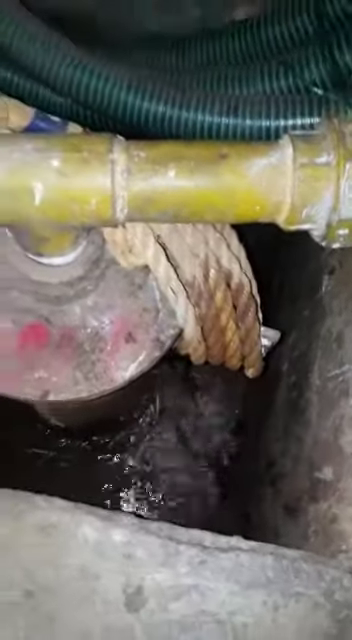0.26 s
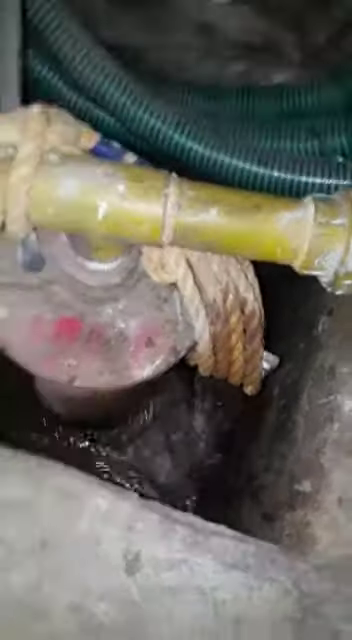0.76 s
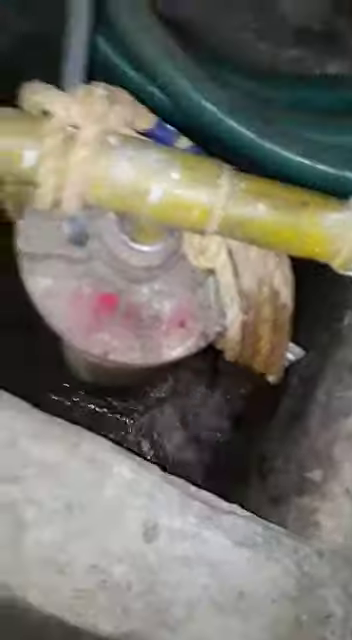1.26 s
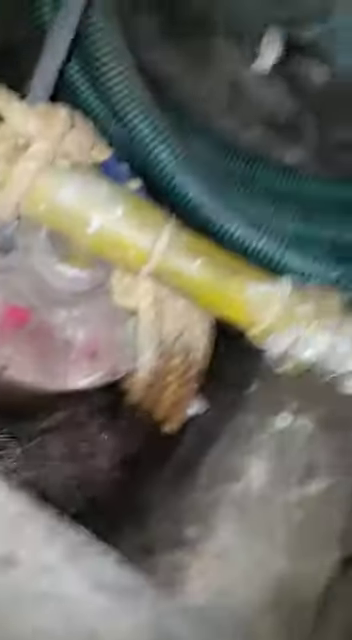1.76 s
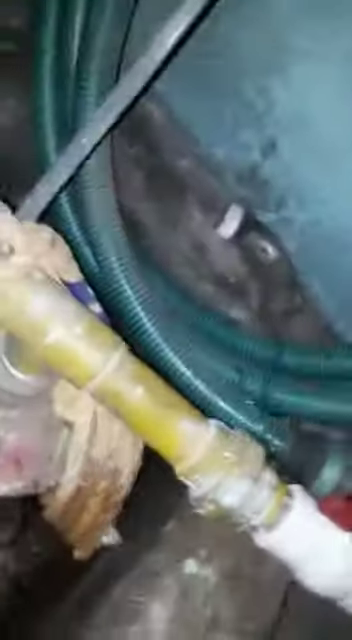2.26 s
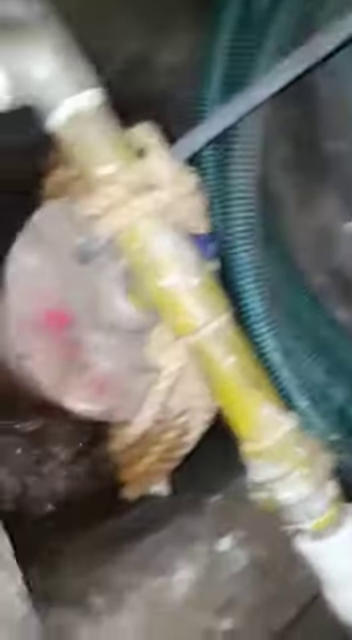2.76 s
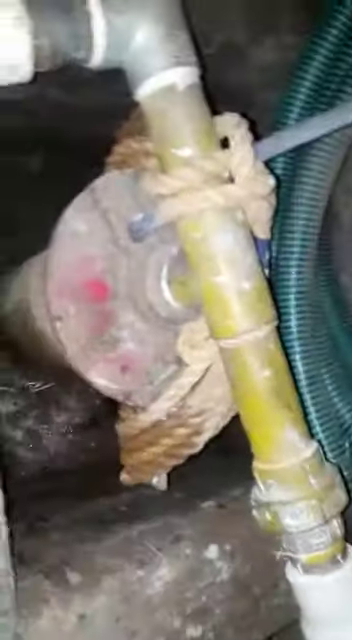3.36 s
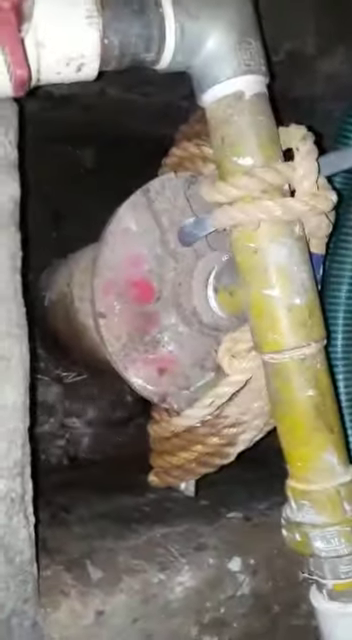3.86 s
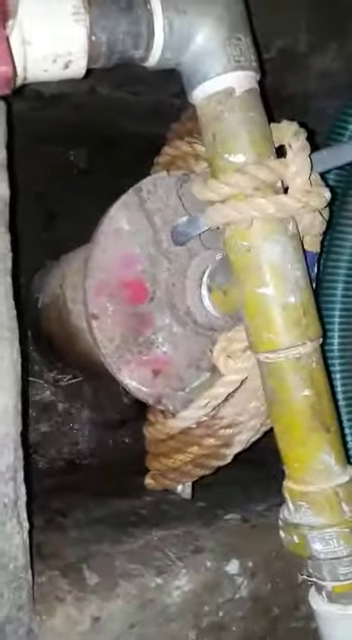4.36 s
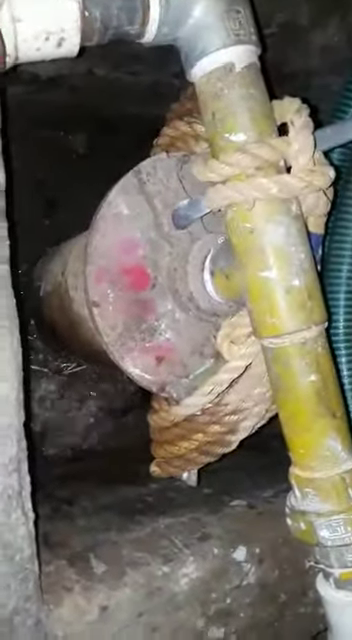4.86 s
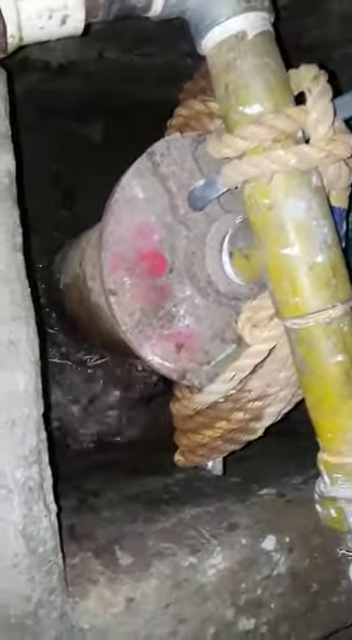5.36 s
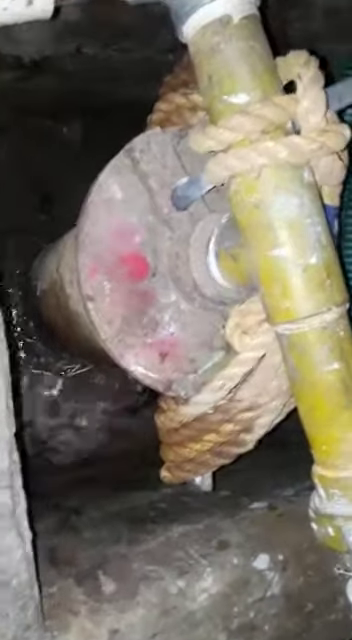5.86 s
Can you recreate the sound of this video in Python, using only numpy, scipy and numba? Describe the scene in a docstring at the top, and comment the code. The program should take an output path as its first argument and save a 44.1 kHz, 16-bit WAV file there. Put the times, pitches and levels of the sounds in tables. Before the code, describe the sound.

A leaking pipe spatters onto wet stone, crisp irregular plinks echoing closely, spray strongest at first, over a very quiet background hush.

```python
"""A narrow concrete pit: water leaks from a pipe joint, heard from a phone held above it.
Behind it lie far flow, room noise and a faint hollow drone, all bands of filtered noise.
A hand shifting on the phone rumbles, rubs once and taps. Fine spray ticks on wet stone,
and drops trap bubbles that ring a few cycles as damped sines; the hard walls echo and ring."""
import sys
import numpy as np
from scipy import signal
from scipy.io import wavfile
from scipy.ndimage import uniform_filter1d
from numba import njit

SR = 44100
rng = np.random.default_rng(int(sys.argv[2]) if len(sys.argv) > 2 else 0)


def to_wav(s):
    """Save 16-bit WAV."""
    ch = np.atleast_2d(s).T  # columns
    pcm = np.round(np.clip(ch, -1, 1) * 32767)  # PCM
    wavfile.write(sys.argv[1], SR, pcm.astype(np.int16))


N = 269451  # length in samples


def undb(db):
    """Amplitude gain from decibels."""
    return 10 ** (np.asarray(db) / 20)


def level(x, db):
    """Scale a sound to an RMS level in dB."""
    return x * undb(db) / np.sqrt(np.mean(x ** 2))


def curve(table, column=1):
    """One column of a table at every sample, in straight lines between its times."""
    rows = np.array(table)
    return np.interp(np.arange(N) / SR, rows[:, 0], rows[:, column])


def balance(table, hz):
    """Level in dB at a pitch, read from a table of pitches and levels along log frequency."""
    rows = np.array(table)
    return np.interp(np.log(hz), np.log(rows[:, 0]), rows[:, 1])


def band(x, hz, width):
    """Two-pole resonance, gain 1 at the centre."""
    b, a = signal.iirpeak(min(hz, .45 * SR), hz / width, fs=SR)
    return signal.lfilter(b, a, x)


def walk(rate):
    """Random levels held 1 / rate s and slewed twice; spread near 1."""
    hold = int(SR / rate)
    steps = np.repeat(rng.standard_normal(N // hold + 1), hold)
    smooth = uniform_filter1d(uniform_filter1d(steps, hold), hold)
    return 1.2 * smooth[:N]


def swell(start, attack, hold, release):
    """Gain that grows exponentially up to start, holds at 1, then dies away; all in seconds."""
    t = np.arange(N) / SR - start
    return np.exp(np.minimum(t / attack, 0) - np.maximum(t - hold, 0) / release)


@njit
def grains(n, start, turn, cycles, size, glide):
    """Damped sines with a soft first cycle; pitch rises by the fraction glide per 20 dB of decay."""
    out = np.zeros(n)
    for g in range(len(start)):
        samples = cycles[g] * 2 * np.pi / turn[g]  # time to fall 20 dB
        phase = 0.
        for i in range(min(int(2.5 * samples), n - start[g])):
            phase += min(turn[g] * (1 + glide[g] * i / samples), 2.8)  # stay below half the sample rate
            fade = np.exp(-2.3 * i / samples)
            onset = min(phase / 6.28, 1.)
            out[start[g] + i] += size[g] * fade * onset * np.sin(phase)
    return out


def ring(s, db, hz, cycles, glide):
    """Grains from times, levels, starting pitches, cycles to fall 20 dB and fractional glide."""
    start = (s * SR).astype(np.int64)
    cycles = np.clip(cycles, .5, 60) + 0 * hz  # adding 0 * hz gives every grain its own value
    return grains(N, start, 2 * np.pi * hz / SR, cycles, undb(db), glide + 0 * hz)


# Colour of the far flow and room noise. Each row: frequency in Hz, relative density in dB per Hz.
HUSH_COLOUR = [(18, -32), (53, -25), (121, -16), (355, -10), (937, -13), (1720, -14), (4000, -15),
               (16000, -15)]
HUSH_DB, HUSH_WAVER_DB = -59.5, 1.5  # overall RMS, and the wander of each band


def hush():
    """Far flow and room noise: half-octave noise bands waver alone and flicker together."""
    out = 0
    flurry = 2.1 * walk(25.17)  # dB, shared by all bands
    for hz in 40 * 2 ** np.arange(0, 8.7, .5):
        db = balance(HUSH_COLOUR, hz) + HUSH_WAVER_DB * walk(4.97) + flurry
        noise = band(band(rng.standard_normal(N), hz, hz / 2), hz, hz / 2)
        out = out + undb(db) * noise
    return level(out, HUSH_DB)


# The faint hollow drone coming and going. Each row: time in seconds, gain in dB.
DRONE_GAIN = [(0, -66), (1.1, -72), (2.5, -61.5), (3.05, -64.5), (3.3, -74.5), (6.11, -72.5)]


def drone():
    """A narrow wavering band of noise, hollow because two resonances near 360 Hz shape it."""
    noise = band(band(rng.standard_normal(N), 365, 97), 351, 160)
    waver = 2.0 * walk(6.73)  # dB
    return level(noise, -1.9) * undb(curve(DRONE_GAIN) + waver)


# The grip shifts and the case rumbles. Each row: start in seconds, hold in seconds, gain in dB.
GRIP_SHIFTS = [(.42, .42, -68.5), (1.75, 0.15, -70), (2.437, .2, -67.5), (3.306, 0.25, -80),
               (3.874, .09, -61), (4.03, 0.1, -68.5), (5.1, 0.3, -65)]
SHIFT_ATTACK_S, SHIFT_RELEASE_S = 0.019, .02
REST_DB = -73.5  # rumble gain between shifts


def grip_rumble():
    """Low lumpy rumble: three broad low resonances of noise, swelling at each shift of the grip."""
    grip = undb(REST_DB)
    for s, hold, db in GRIP_SHIFTS:
        grip = grip + undb(db) * swell(s, SHIFT_ATTACK_S, hold, SHIFT_RELEASE_S)
    lumps = undb(4 * walk(50))
    noise = band(band(band(rng.standard_normal(N), 78, 150), 168, 186), 96, 370)
    return level(noise, 0) * grip * lumps


RUB_S, RUB_ATTACK_S, RUB_HOLD_S, RUB_RELEASE_S = 1.23, .007, .056, 0.014
RUB_DB = -39.5  # RMS before the swell shapes it


def skin_rub():
    """One scrape of skin on the case: uneven noise through body resonances, briefly let through."""
    slips = rng.standard_normal(N) * undb(1.9 * walk(300))
    low = band(band(slips, 250, 220), 260, 220)
    skin = band(slips, 455, 330) + 0.084 * band(slips, 860, 1200) + 0.34 * low
    return level(skin, RUB_DB) * swell(RUB_S, RUB_ATTACK_S, RUB_HOLD_S, RUB_RELEASE_S)


# Soft finger taps on the phone. Each row: start in seconds, level in dB before the bass cut, pitch in Hz.
FINGER_TAPS = [(0.417, -24, 890), (0.658, -32, 450), (1.284, -26, 520), (2.225, -26, 595),
               (2.746, -35.5, 210), (3.231, -36, 372), (3.507, -36.5, 101), (4.991, -39.5, 110),
               (5.41, -36.5, 110)]
BASS_CUT_HZ = 60


def hand():
    """Handling noise at the microphone: rumble, rub and heavily damped taps, with the deep bass cut."""
    s, db, hz = np.transpose(FINGER_TAPS)
    handling = grip_rumble() + skin_rub() + ring(s, db, hz, 1.37, 0.)
    b, a = signal.butter(2, BASS_CUT_HZ, "high", fs=SR)
    return signal.lfilter(b, a, handling)


# The leak as heard from the moving phone.
# Each row: time in seconds, small bubbles in dB, fine spray in dB, sound sent to the walls in dB.
FLOW_LEVELS = [(0, -49, -41.5, -8.5), (1, -59.5, -49, -2.5), (1.6, -63, -44.5, -2.5), (2, -52.5, -59, -1.5),
               (2.5, -56.5, -58, 0.5), (3, -56, -57.5, 0.5), (4, -55.5, -61.5, -0.5), (5, -55, -59, -1.5),
               (6.11, -52.5, -54, 2)]
# The loudest spray striking wet stone. Each row: start in seconds, level in dB, centre pitch in Hz.
LOUD_SPLATS = [(0.086, -16, 11500), (0.1047, -16, 14100), (0.1796, -5.5, 11900), (0.3519, -9.5, 10900),
               (0.402, -8, 10600), (0.4985, -0.5, 15200), (0.552, -10, 15200), (0.6055, -17, 14700),
               (0.662, -16, 12900), (0.7433, -11, 14100), (0.825, -24, 13200), (0.8863, -7.5, 13800),
               (1.1093, -12, 14700), (1.1963, -11, 15500), (1.244, -7.5, 15600), (1.5294, -9.5, 15100),
               (1.5798, -3, 14000), (2.137, -17, 10500), (2.166, -17, 14100), (2.2672, -21.5, 13700),
               (2.3267, -20, 12700), (2.6633, -18, 13400), (3.3885, -14.5, 12500), (4.914, -33, 13400)]
MIST_FLURRY_DB = 3.5


def spray(count=9000):
    """Droplets too small to trap air tick on the stone as very short high rings, in flurries."""
    s, db, hz = np.transpose(LOUD_SPLATS)
    when, pitch, big = rng.random((count, 3)).T
    ticks = ring(when * N / SR, 16 * big ** 4, 5000 + 11000 * pitch, 1.2 + 3 * pitch, 0.)
    mist = ticks * undb(MIST_FLURRY_DB * walk(40))
    return ring(s, db, hz, 3.2, 0.) + level(mist, 0) * undb(curve(FLOW_LEVELS, column=2))


# Loudness of the small bubbles by pitch. Each row: pitch in Hz, relative level in dB.
BUBBLE_BALANCE = [(900, -24.5), (1500, -24.5), (2700, 2.5), (4000, 0.5), (6000, 6), (8500, 11), (11000, -3)]


def small_bubbles(count=2000):
    """Many tiny drops at chance moments, each ringing a bubble whose pitch rises."""
    when, pitch, big, long = rng.random((count, 4)).T
    hz = 900 * 12 ** pitch
    db = balance(BUBBLE_BALANCE, hz) + 13 * big ** 3  # a few stand out
    bubbles = ring(when * N / SR, db, hz, 2.1 + 5.3 * long, 0.11)
    return level(bubbles, 0) * undb(curve(FLOW_LEVELS))


LESSER_LOW_HZ, LESSER_HIGH_HZ = 1358, 8580
LESSER_CYCLES = 5.2  # mean cycles to fall 20 dB
LESSER_DB, LESSER_DB_PER_OCTAVE = -42, 7  # mean level at 2.5 kHz, and its rise with pitch
LESSER_SPREAD_DB = 10  # full range around the mean


def lesser_drips(count=130):
    """Weaker drops drawn by chance, as rows of start, level, bubble pitch and cycles."""
    when, pitch, big, long = rng.random((count, 4)).T
    hz = LESSER_LOW_HZ * (LESSER_HIGH_HZ / LESSER_LOW_HZ) ** pitch
    db = LESSER_DB + LESSER_DB_PER_OCTAVE * np.log2(hz / 2500) + LESSER_SPREAD_DB * (big - .5)
    return np.transpose([when * N / SR, db, hz, LESSER_CYCLES * (.5 + long)])


# The drops that stand out.
# Each row: start in seconds, level in dB before the walls, bubble pitch in Hz, cycles to fall 20 dB.
CLEAR_DRIPS = [(0.0398, -26, 3000, 3.9), (0.0853, -35.5, 1830, 7.9), (0.219, -22.5, 2210, 4.3),
               (0.3592, -25, 3720, 8.7), (0.5323, -25.5, 2950, 4.9), (0.5592, -24, 5950, 7.8),
               (0.568, -34, 1116, 8.6), (0.6395, -18, 3260, 5), (0.692, -37.5, 1166, 10.7),
               (0.7167, -27.5, 5400, 7.6), (0.745, -27, 2900, 5.9), (0.7532, -30, 1970, 3),
               (0.8062, -21.5, 7750, 14), (0.8602, -27.5, 4360, 5.5), (0.8741, -45, 1400, 6.6),
               (0.977, -33.5, 2120, 3.7), (1.084, -41.5, 1340, 10), (1.1176, -25, 3870, 3.7),
               (1.1527, -30, 3460, 6.3), (1.2342, -20.5, 2870, 5.4), (1.3574, -43, 2700, 16),
               (1.4467, -20, 8240, 14.6), (1.4664, -39.5, 2550, 9.8), (1.4918, -39, 2580, 9.7),
               (1.5206, -24.5, 1790, 2.2), (1.5296, -22.5, 3560, 5.5), (1.7085, -27.5, 1950, 1.8),
               (1.7283, -33, 3430, 15), (1.754, -21, 6200, 3.5), (1.775, -30.5, 2600, 8.4),
               (1.845, -33.5, 1650, 4), (1.906, -34.5, 2490, 12), (1.9455, -25.5, 3270, 5.9),
               (1.98, -30, 5480, 13), (2.0553, -30, 2240, 8.4), (2.0862, -25.5, 2540, 8.6),
               (2.087, -30, 1240, 4.5), (2.1377, -38.5, 1400, 14), (2.1587, -26.5, 3850, 2.3),
               (2.212, -35, 2950, 9.9), (2.2236, -25, 5900, 5.2), (2.3498, -33, 2980, 5.9),
               (2.423, -38, 2470, 6.3), (2.4533, -41.5, 1490, 7.4), (2.5283, -28, 8600, 13),
               (2.5547, -25.5, 4250, 2.7), (2.6655, -20, 4560, 4), (2.717, -36, 2170, 11),
               (2.768, -33, 1400, 2.9), (2.839, -23, 2870, 5.5), (2.8937, -24.5, 2830, 2.3),
               (3.1008, -47.5, 1750, 18), (3.1639, -17.5, 2836, 15.4), (3.252, -31.5, 2830, 8.4),
               (3.375, -20.5, 2950, 4.9), (3.4618, -28, 3360, 13), (3.6, -34.5, 2730, 13),
               (3.6215, -25.5, 7470, 10), (3.6911, -26, 5900, 7.5), (3.7844, -28, 3280, 4.9),
               (3.9018, -32.5, 2570, 10), (3.9323, -28.5, 2760, 7.7), (4.033, -24, 5830, 7.2),
               (4.0532, -36.5, 1520, 5.2), (4.1099, -26.5, 2600, 2.9), (4.1301, -47, 1020, 6.5),
               (4.2217, -29, 2200, 2.5), (4.2588, -27, 2210, 2), (4.3164, -33, 3280, 5.1),
               (4.3643, -12.5, 3100, 6.9), (4.4539, -29.5, 2380, 3.5), (4.4922, -25.5, 5640, 8.1),
               (4.5044, -26.5, 2570, 3.6), (4.5262, -24.5, 2780, 5.3), (4.5272, -17.5, 6250, 4.3),
               (4.5608, -30.5, 1790, 7.8), (4.5844, -30.5, 2560, 19), (4.67, -22.5, 4650, 6.4),
               (4.6824, -15.5, 3190, 7.4), (4.7542, -46, 1500, 9.9), (4.798, -31.5, 5650, 8.8),
               (4.9166, -19.5, 2920, 4.9), (5.0096, -34, 2960, 10), (5.026, -31.5, 5440, 24),
               (5.1213, -31.5, 1630, 4.5), (5.1702, -30, 2870, 6.7), (5.2547, -34.5, 2520, 7.5),
               (5.2743, -26, 7050, 6.2), (5.4216, -46, 1740, 16), (5.4766, -39.5, 1340, 7.5),
               (5.5344, -28, 6050, 11), (5.5535, -26.5, 4600, 6.4), (5.598, -20.5, 5200, 3.5),
               (5.6477, -29, 4100, 6.1), (5.6977, -46, 1530, 16), (5.7549, -21, 4160, 5.6),
               (5.7634, -37, 1600, 6.9), (5.7846, -24, 2670, 3.7), (5.8371, -43.5, 1750, 17),
               (5.9402, -39, 1510, 4.7), (6.083, -23, 2800, 1.7), (6.0886, -20, 7350, 4.4)]
GLIDE_HZ = 204  # climb of a bubble's pitch while it falls 20 dB


def drips(count=8):
    """Each drop slaps the pool, its bubble rings with rising pitch, and droplets fall back around it."""
    s, db, hz, cycles = np.vstack([CLEAR_DRIPS, lesser_drips()]).T
    late, pitch, size = rng.random((len(s), 3, count)).transpose(1, 2, 0)
    droplet_s = s + 0.027 * late ** 2
    droplet_db = db - 3.5 - 8 * late - 8 * size  # later ones are weaker
    droplet_hz = np.minimum(hz * 5. ** pitch, 15000)
    droplets = ring(droplet_s.ravel(), droplet_db.ravel(), droplet_hz.ravel(), 6.6, 0.)
    slap = ring(s - .001, db - 13.5, np.minimum(1.76 * hz, 13000), 3.6, 0.)
    bubble = ring(s, db, hz, cycles, GLIDE_HZ / hz)
    return bubble + slap + droplets


# First echoes of the near walls. Each row: delay in seconds, level in dB before the scatter.
NEAR_ECHOES = [(.0008, -28), (.0023, -1), (.0044, -8.5), (.0080, -3.5)]
# Air resonances of the pit. Each row: frequency in Hz, width in Hz, level in dB over RING_DB.
AIR_RESONANCES = [(1154, 39, 7), (1465, 15, 0), (1545, 22.7, 6.5), (1843, 20, -0.5), (2170, 8.7, 1),
                  (2502, 138, 18), (2553, 12, 4), (2626, 55, 5), (2740, 66, 13), (3177, 36, 7),
                  (3445, 17, 2), (3570, 16, -39), (4170, 100, -3.5), (4702, 165, 10.5)]
RING_DB = -40.5
# The fading echo tail.
# Each row: centre in Hz, time to fall 60 dB in seconds, level in dB before scaling with frequency.
ECHO_TAIL = [(520, 1, -18), (1040, 0.21, -24.5), (2070, 0.29, -23.5), (4330, 0.19, -19),
             (7900, 0.24, -27.5), (15000, 0.046, -21)]


def walls():
    """Answer of the pit at one spot: first echoes, air resonances and a dense fading tail."""
    t = np.arange(SR // 3) / SR
    answer = np.zeros(len(t))
    for s, db in NEAR_ECHOES:
        answer[int(s * SR)] += undb(db)
    answer = band(answer, 5040, 6900)  # rough concrete scatters the top
    for hz, width, db in AIR_RESONANCES:
        tone = np.sin(2 * np.pi * (hz * t + rng.random()))
        answer += undb(db + RING_DB) * np.exp(-np.pi * width * t) * tone
    for hz, t60, db in ECHO_TAIL:
        noise = band(rng.standard_normal(len(t)), hz, 0.41 * hz)
        onset = np.clip(t / 0.00033, 0, 1)
        answer += level(noise, db + 10 * np.log10(hz / SR)) * 1000 ** (-t / t60) * onset
    return answer


def pit(x, count=20):
    """Direct sound plus walls; the phone keeps moving, so each stretch gets a new wall answer."""
    out = np.pad(x, (0, SR))  # room for the last echoes
    heard = x * undb(curve(FLOW_LEVELS, column=3))
    size = N // count + 1
    for start in range(0, N, size):
        echo = signal.fftconvolve(heard[start:start + size], walls())
        out[start:start + len(echo)] += echo
    return out[:N]


def scene():
    """The water rings inside the pit; background and handling reach the microphone without its echo."""
    water = drips() + small_bubbles() + spray()
    return (pit(water) + hush() + drone() + hand())[None]


TOP_HZ = 15900  # upper limit of the phone
OFFSET = -.0006  # constant shift, in full scales


def record(dry):
    """The microphone port dips near 10 kHz; the phone cuts the top and sits slightly off zero."""
    ported = dry - 0.55 * band(dry, 10490, 2200)
    top_cut = signal.ellip(10, .2, 60, TOP_HZ, fs=SR, output="sos")
    return signal.sosfilt(top_cut, ported) + OFFSET


dry = scene()
out = record(dry)
to_wav(out)
```